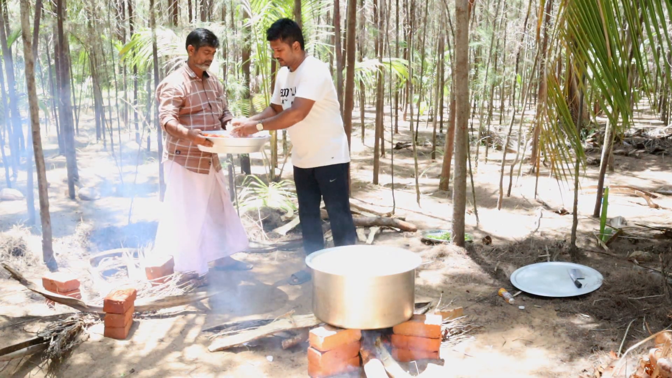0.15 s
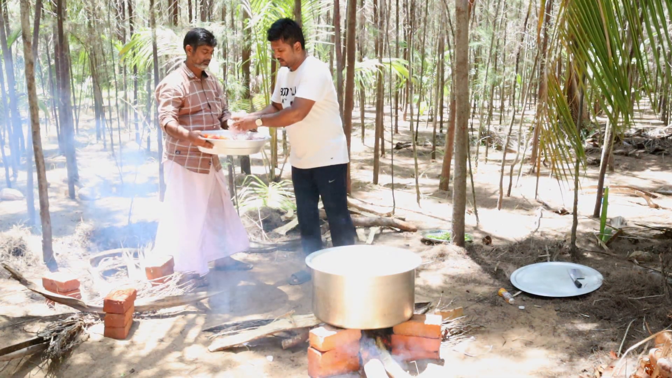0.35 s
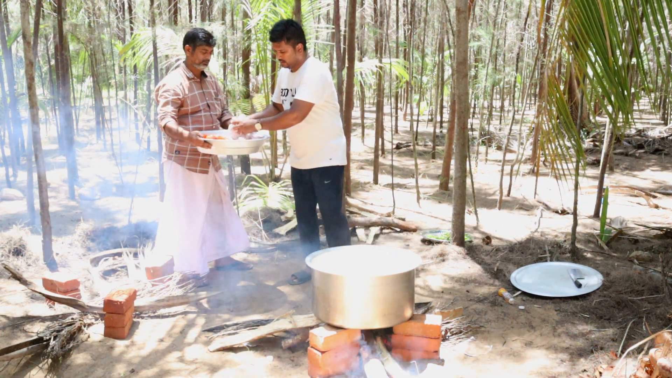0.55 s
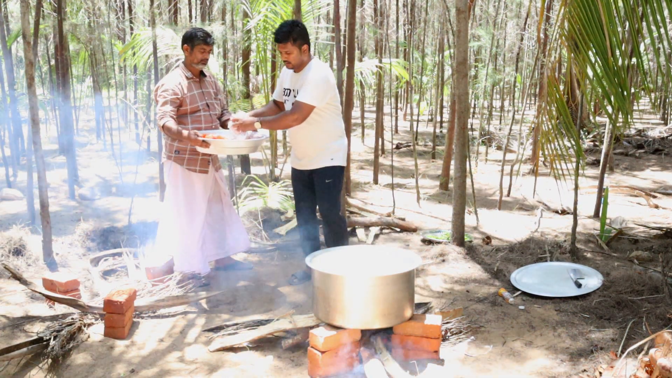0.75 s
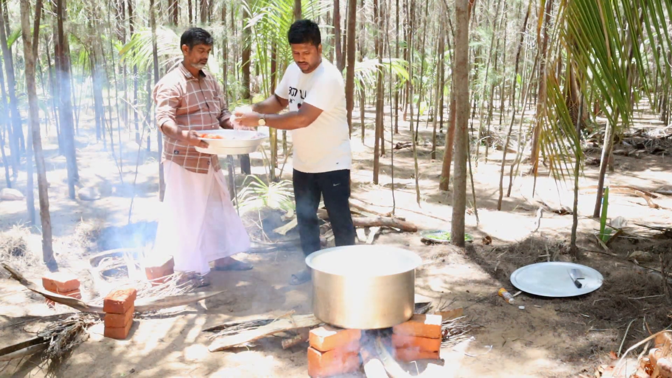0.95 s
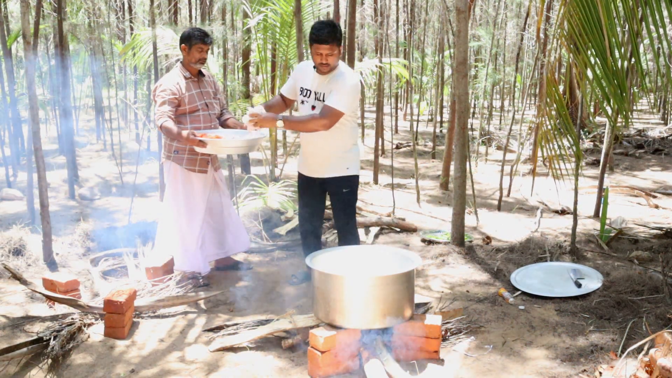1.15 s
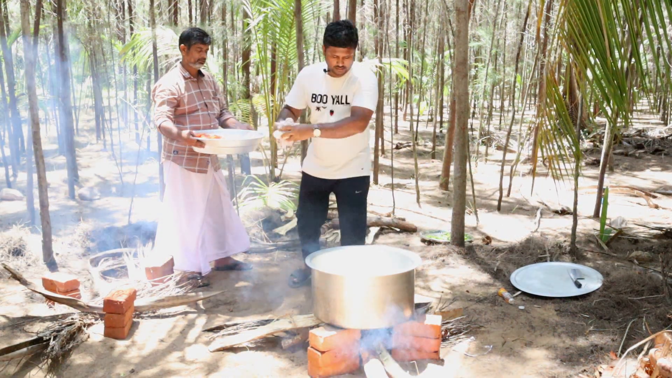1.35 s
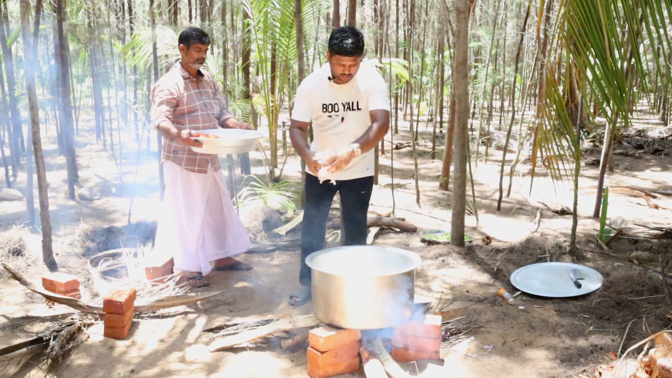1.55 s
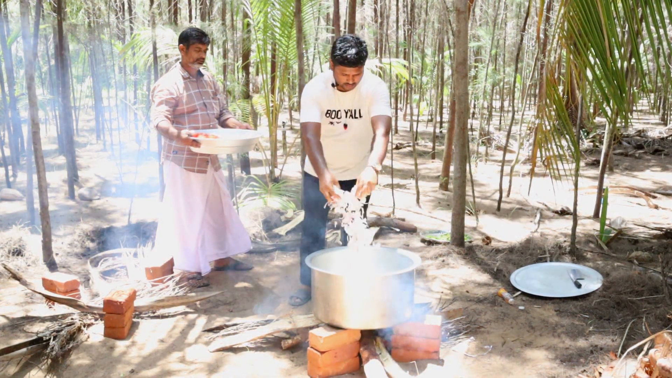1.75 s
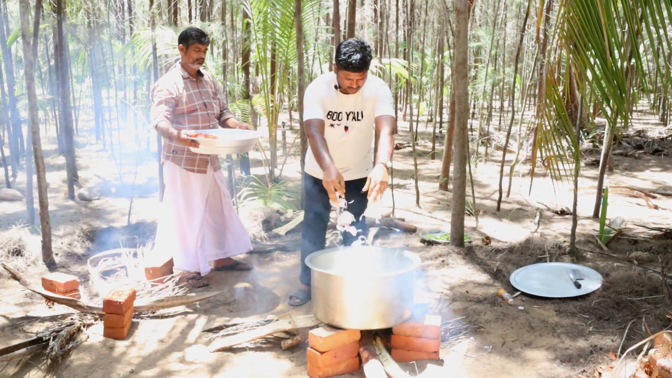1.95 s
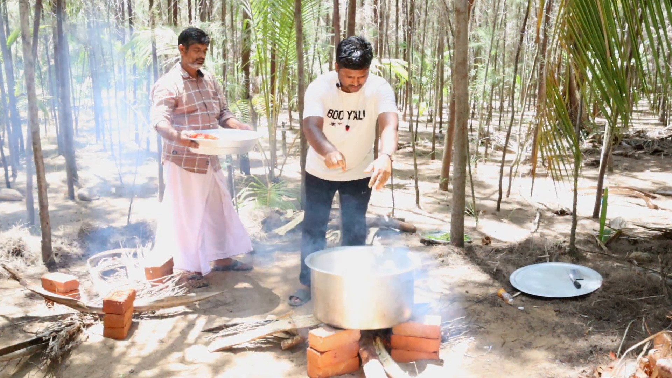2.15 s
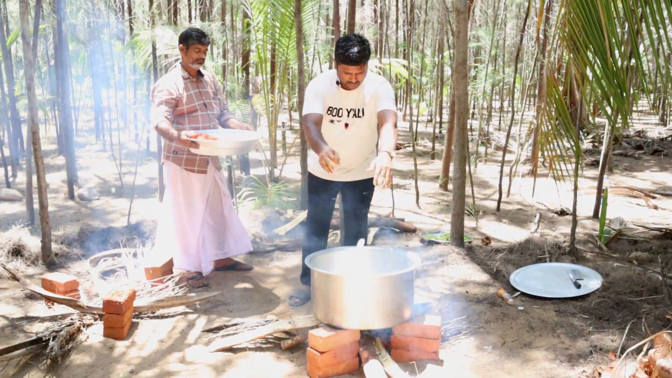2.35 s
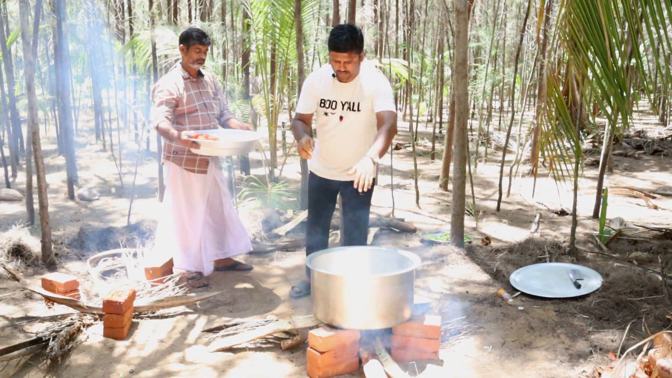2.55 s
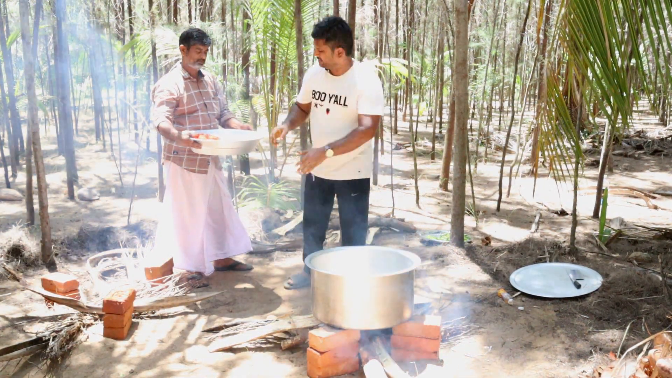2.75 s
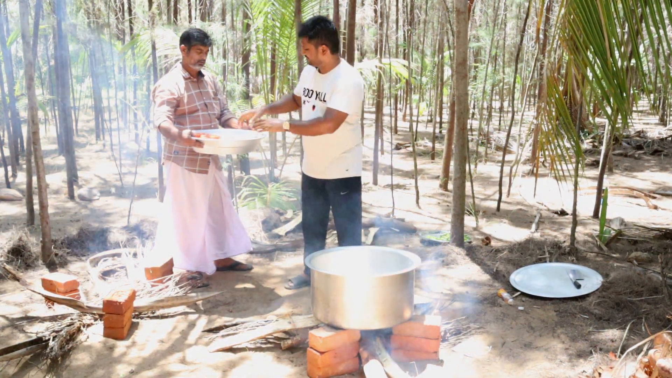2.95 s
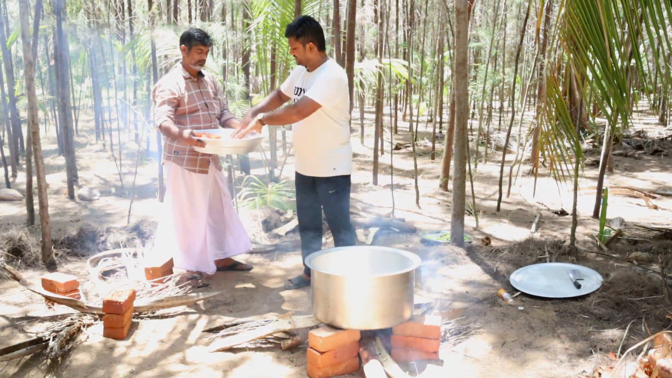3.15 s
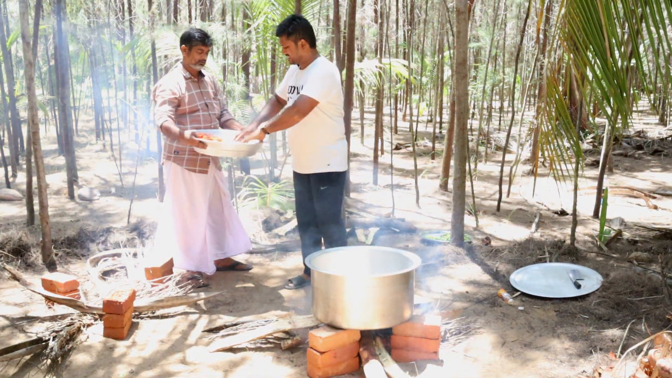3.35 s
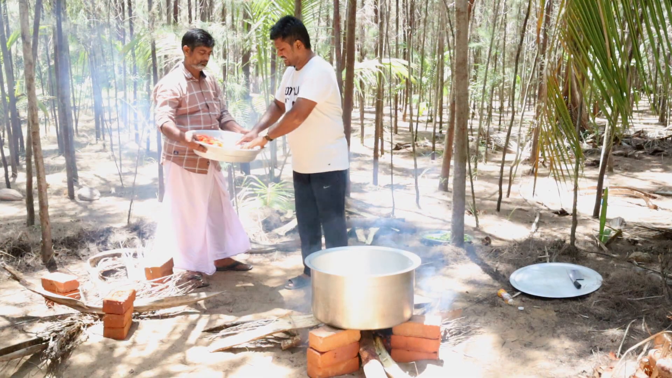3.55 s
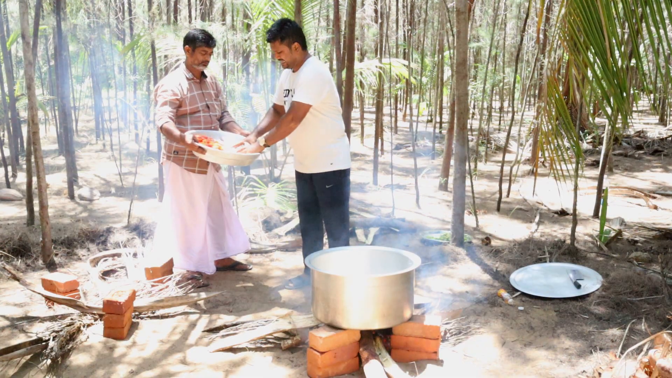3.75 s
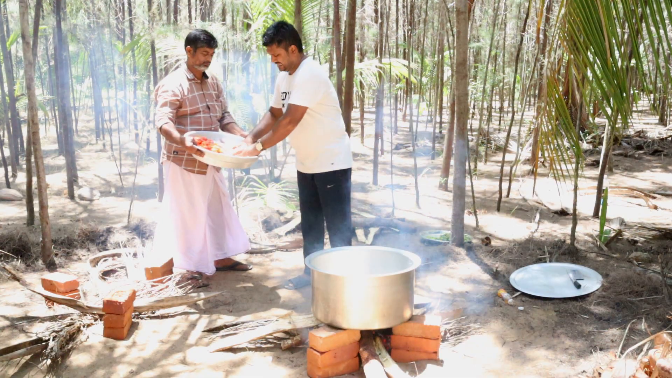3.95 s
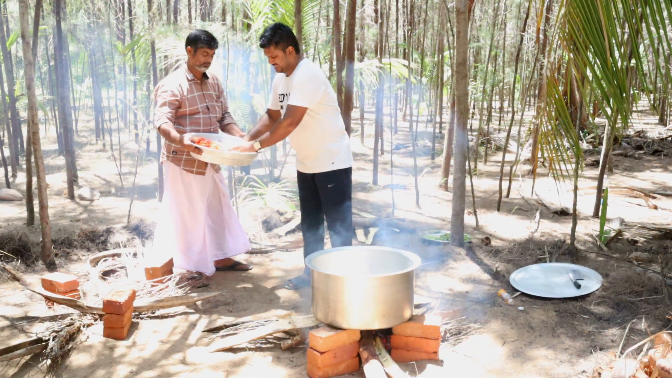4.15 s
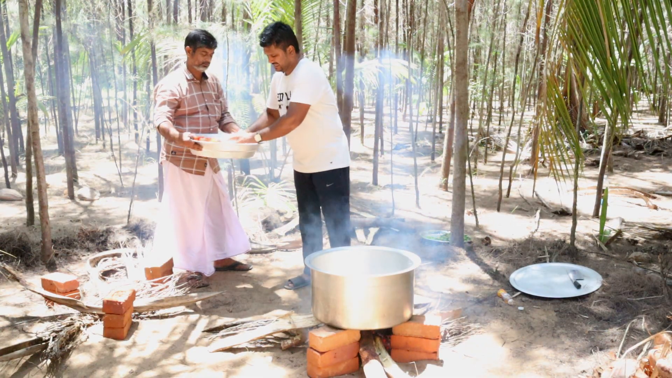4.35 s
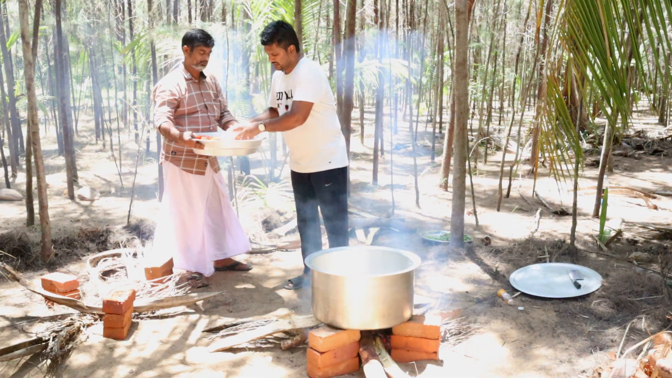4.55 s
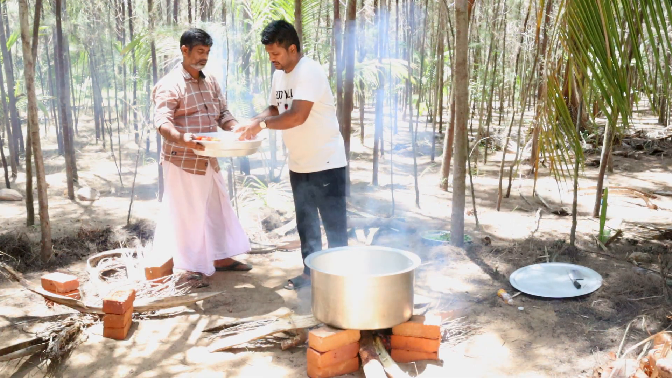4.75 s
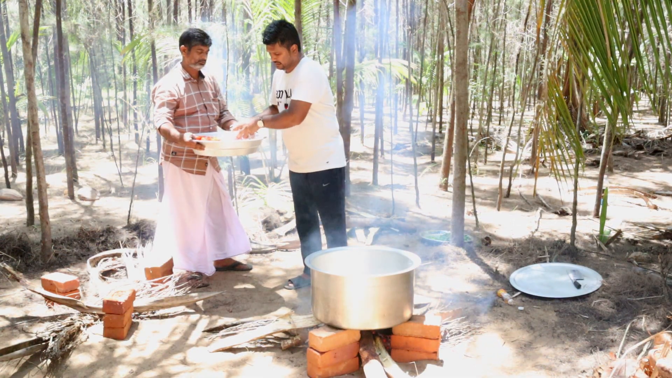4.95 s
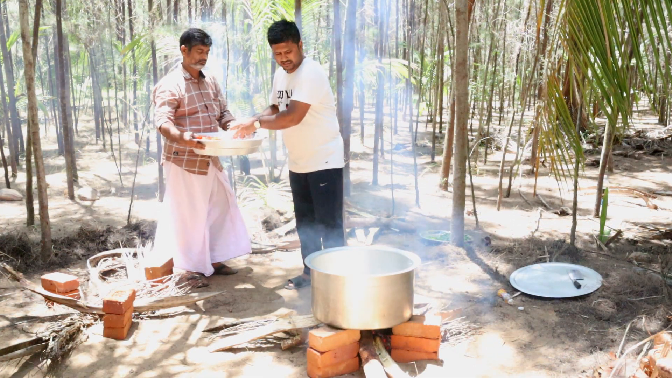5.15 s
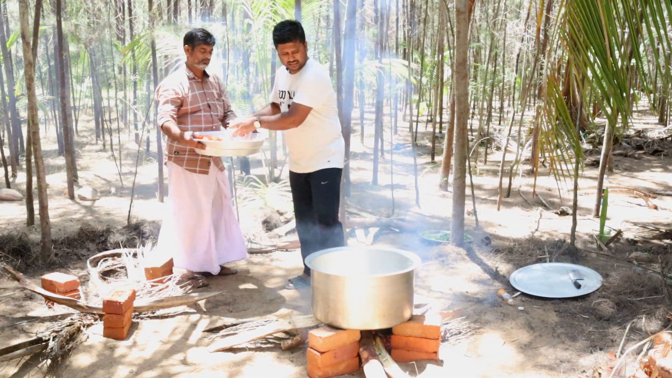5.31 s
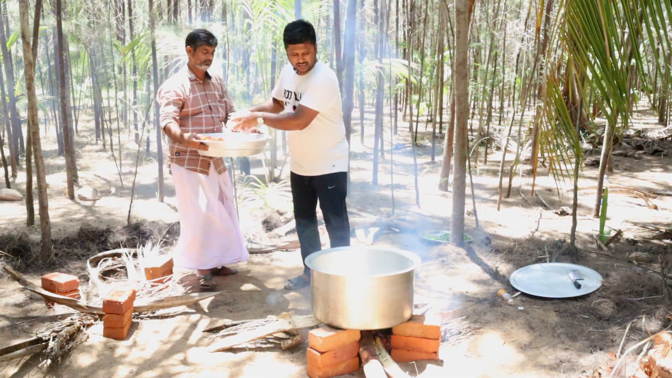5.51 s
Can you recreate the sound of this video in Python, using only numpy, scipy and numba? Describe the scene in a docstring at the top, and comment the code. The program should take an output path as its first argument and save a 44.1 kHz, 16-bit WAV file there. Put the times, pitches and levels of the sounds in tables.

```python
"""A wide metal pot of oil simmers over an open wood fire: damped bubble rings and fine hiss seethe together,
filtered noise makes the fire's soft roar and the wind's rumble, and hands rustle in a bowl of onion slices.
Droplets pop as clusters of short rings. Near two seconds a handful of slices drops in: a dense spatter,
struck pot modes and low gulps of trapped air sound as the oil flares into a loud sizzle with a steam hiss.
The sizzle then dies back to a crackle, while popping and rustling go on."""
import sys
import numpy as np
from scipy import signal
from scipy.fft import rfft, irfft
from scipy.io import wavfile
from scipy.ndimage import uniform_filter1d
from numba import njit

SR = 44100
rng = np.random.default_rng(int(sys.argv[2]) if len(sys.argv) > 2 else 0)


def persist_wave(psi):
    """Save psi, clipped to +-1, as 16-bit WAV."""
    counts = np.round(np.clip(psi, -1, 1) * 32767).astype(np.int16)
    wavfile.write(sys.argv[1], SR, np.atleast_2d(counts).T)


N = 246078

# How hard the oil fries. Each row: time in seconds, vigour in dB.
VIGOUR = [(0.0, -44), (0.53, -48), (1.15, -48), (1.92, -40.5), (1.96, -34.5), (2.11, -32.5), (2.33, -32),
          (2.56, -33), (2.77, -36.5), (3.0, -40), (3.09, -45), (3.9, -46.5), (4.62, -46.5), (5.58, -49)]
SIMMER_DB = -49  # the vigour that counts as a simmer
SPLASH_S = 1.957  # the handful hits the oil


def undb(db):
    """Level and amplitude: 20 dB is a factor of ten in gain."""
    return 10 ** (np.asarray(db) / 20)


def unit(x):
    """Normalization: scale a signal to rms 1."""
    return x / np.sqrt(np.mean(x ** 2))


def curves(table):
    """Linear interpolation: each column of a timed table becomes one value per sample."""
    s, *columns = np.transpose(table)
    return [np.interp(np.arange(N) / SR, s, column) for column in columns]


def colour(x, spectrum):
    """Spectral shaping: weight each frequency by (Hz, dB) points joined on a log frequency axis."""
    hz, db = np.transpose(spectrum)
    f = np.maximum(np.arange(N // 2 + 1) * SR / N, 1)
    gain = undb(np.interp(np.log(f), np.log(hz), db))
    return unit(irfft(rfft(x) * gain, N))


def walk(rate):
    """Slow random fluctuation: levels held 1 / rate seconds, smoothed twice and scaled to rms 1."""
    hold = int(SR / rate)
    steps = np.repeat(rng.standard_normal(N // hold + 1), hold)
    smooth = uniform_filter1d(uniform_filter1d(steps, hold), hold)
    return unit(smooth[:N])


@njit
def rings(start, hz, t60, size, rise, count):
    """Damped resonance: each sine swells over about rise cycles and decays, cut off 40 dB down."""
    out = np.zeros(count)
    for k in range(len(start)):
        turn = np.exp(2j * np.pi * hz[k] / SR - np.log(1000) / (t60[k] * SR))
        z, gap, shrink = size[k] + 0j, 1., np.exp(-hz[k] / (rise * SR))
        for i in range(int(start[k]), min(count, int(start[k] + t60[k] * SR * 2 / 3))):
            out[i] += z.imag * (1 - gap)
            z *= turn
            gap *= shrink
    return out


def above(x, hz):
    """Radiation efficiency: a small source radiates little bass, hence a high-pass."""
    return signal.sosfilt(signal.butter(3, hz, "high", fs=SR, output="sos"), x)


def add(out, s, db, sound):
    """Superposition: add a short sound at a time and peak level."""
    i = int(s * SR)
    out[i:i + len(sound)] += undb(db) * sound[:N - i] / np.abs(sound).max()


def bubbles(hz, octaves, cycles, rate, scatter_db):
    """Bubble resonance: steam bubbles burst at random, each ringing at a pitch set by its size.

    Centre in Hz, spread in octaves, cycles to fall 30 dB, grains a second, exponential level scatter in dB.
    """
    when, pitch, chance = rng.random((40000, 3))[:int(rate * N / SR)].T
    octave = octaves * np.log(pitch / (1 - pitch) + 1e-9) / 2  # logistic spread
    f = np.clip(hz * 2 ** octave, 150, 16000)
    size = undb(-scatter_db * np.log(1 - .998 * chance))  # a few are far louder
    grains = rings(when * N, f, 2 * cycles / f, size, 0.31, count=N)
    return unit(above(grains, 0.4 * hz))


def follow(layer):
    """Common drive: the level in dB of a layer rises and falls with the vigour of the frying."""
    # Each entry: level in dB at a simmer, dB per dB of vigour, lag in seconds (negative leads).
    follow_rows = {"wet": (-68.5, 1.77, 0.026), "large": (-57.5, 1.23, -0.047),
                   "middle": (-56.5, 0.7, 0.089), "small": (-54, 1.07, 0.071), "hiss": (-57, 0.98, 0.14),
                   "roar": (-57, 0.52, -0.094)}
    db, slope, lag_s = follow_rows[layer]
    s, vigour_db = np.transpose(VIGOUR)
    delayed_db = np.interp(np.arange(N) / SR - lag_s, s, vigour_db)
    return db + slope * (delayed_db - SIMMER_DB)


def spits(rate, scatter_db, tail_ms):
    """Impulsive excitation: lone spits of oil swell for about a millisecond and decay exponentially."""
    when, chance = rng.random((4000, 2)).T
    kicks = np.zeros(N)
    alive = np.arange(len(when)) < rate * N / SR
    size = undb(-scatter_db * np.log(1 - .96 * chance))
    np.add.at(kicks, (when * N).astype(int), alive * size)
    decay = np.exp(-1000 / (max(tail_ms, .1) * SR))
    return signal.lfilter([1], [1, -decay], uniform_filter1d(kicks, size=60))


def frying():
    """Superposed boiling noise: bubbles of four sizes, fine hiss and steam, lifted briefly by each spit."""
    # Steam rushing from the wet slices. Each row: time in seconds, level in dB.
    flare = [(1.55, -55.5), (1.74, -53), (1.95, -46.5), (2.09, -37.5), (2.19, -39), (2.35, -34.5),
             (2.49, -36.5), (2.63, -41.5), (2.9, -75), (3.09, -54), (3.2, -74)]
    # Spectrum of the rushing steam. Each row: frequency in Hz, relative level in dB per Hz.
    steam_spectrum = [(9000, -16.5), (10500, -3), (11700, 9.5), (13000, 8), (14400, 2), (15300, -11)]
    # Noise spectrum for the fine hiss, nearly flat from 7 to 13.5 kHz, with a steep low-pass edge above.
    # Each row: frequency in Hz, relative level in dB per Hz.
    hiss_spectrum = [(5000, -11), (7000, -5.5), (10000, -4.5), (13500, -5), (14300, -21), (14600, -45)]
    # Columns as bubbles() takes them; "wet" is water boiling out of the slices.
    sizes = {"wet": (2270, 0.091, 2.6, 1500., 5.3), "large": (1890, 0.41, 3.6, 1400., 2),
             "middle": (3300, 0.36, 6.7, 2200, 0.93), "small": (5230, 0.24, 6.4, 3000., 2.66)}
    steam_db, = curves([(flare[0][0] - .15, -80), *flare, (flare[-1][0] + 0.17, -80)])
    spit = spits(rate=89.0, scatter_db=4.1, tail_ms=1.82)
    boil = sum(undb(follow(layer)) * bubbles(*size) for layer, size in sizes.items())
    boil = signal.sosfilt(signal.butter(6, 9500, fs=SR, output="sos"), boil)
    fine_hiss = undb(follow("hiss")) * colour(rng.standard_normal(N), hiss_spectrum)
    steam = undb(steam_db) * colour(rng.standard_normal(N), steam_spectrum)
    seething = undb(1.3 * walk(9))
    hiss_flutter = undb(0.58 * walk(25.4))
    return seething * ((1 + .25 * spit) * boil + (1 + .5 * spit) * hiss_flutter * (fine_hiss + steam))


def air():
    """Turbulence noise: the fire's fluttering roar, and wind in gusts on the microphone."""
    # Spectrum of the fire. Each row: frequency in Hz, relative level in dB per Hz.
    roar_spectrum = [(70, -10.5), (130, -4), (230, -2.5), (345, -8), (560, -4.5), (900, -5.5), (1200, -11),
                     (2500, -44)]
    # Spectrum of the wind. Each row: frequency in Hz, relative level in dB per Hz.
    wind_spectrum = [(12, -1), (26, -1.5), (48, 3.5), (110, -2), (200, -40)]
    # Gusts before flutter. Each row: centre in seconds, level in dB added to the breeze, length in seconds.
    gusts = [(0.47, -53, 0.058), (0.62, -64, 0.26), (1.3, -83, 2.6), (1.44, -50, 0.13), (1.617, -48, 0.094),
             (1.85, -56, 0.31)]
    breeze_db = -61.5
    t = np.arange(N) / SR
    wind = undb(breeze_db) + sum(undb(db) * np.exp(-(2 * (t - s) / length) ** 2) for s, db, length in gusts)
    roar = undb(follow("roar") + 1.5 * walk(16)) * colour(rng.standard_normal(N), roar_spectrum)
    return roar + wind * undb(3.4 * walk(14.)) * colour(rng.standard_normal(N), wind_spectrum)


def rustle():
    """Granular contact and cavity resonance: slices slip over each other in patches and tap the bowl."""
    # Hands gathering slices, before flutter. Each row: time in seconds, slipping in dB, hollow taps in dB.
    gathering = [(0, -64.5, -61.5), (.7, -52.5, -57.5), (1.1, -64, -62), (2.8, -51, -59), (3.15, -56, -54),
                 (3.45, -52.5, -57.5), (3.85, -48.5, -53), (4.25, -51, -61), (4.36, -54, -58.5),
                 (4.5, -55.5, -61), (4.75, -54.5, -52.5), (5.2, -64, -63.5), (5.58, -56, -59.5)]
    slices_db, bowl_db = curves(gathering)
    patches = undb(2.7 * walk(22.11))
    slipping = bubbles(hz=1210, octaves=0.57, cycles=2, rate=900, scatter_db=1.6)
    taps = bubbles(hz=358, octaves=0.17, cycles=4, rate=140., scatter_db=0.56)
    return patches * (undb(slices_db) * slipping + undb(bowl_db) * taps)


def crackle(count=420):
    """Inhomogeneous random process: rows of small pops, denser and louder when the oil fries harder."""
    level_db, scatter_db, centre_hz, octaves = -37, 1.5, 3990, 0.356
    level_follow, crowd = 0.75, .5  # level and density of the pops, dB per dB of vigour
    when, loud, spread = rng.random((count, 3)).T
    t = np.arange(0, N - 1, 100) / SR
    vigour_s, vigour_db = np.transpose(VIGOUR)
    busy = np.cumsum(undb(crowd * np.interp(t, vigour_s, vigour_db)))
    s = np.interp(when * busy[-1], busy, t)  # inverse of the cumulative density
    lift_db = np.interp(s, vigour_s, vigour_db) - SIMMER_DB
    hz = centre_hz * 2 ** (octaves * rng.standard_normal(count))
    peak_db = level_db + level_follow * lift_db - scatter_db * np.log(1 - .95 * loud)
    # tighter chirps in bare oil, broader ticks once the slices are in
    pitch_spread = np.where(s < SPLASH_S, .14, .24) + 0.826 * spread
    return np.transpose([s, peak_db, hz, pitch_spread])


def pops(count=12):
    """Modal clustering: a tight cluster of pitches chirps, a wide one cracks; the pot walls scatter it."""
    # Bursting droplets and fire cracks, before scattering.
    # Each row: start in seconds, peak in dB, pitch in Hz, nominal pitch spread in octaves.
    bursts = [(0.5712, -20.5, 4800, 0.79), (0.5815, -28, 1070, 0.93), (0.8395, -29.5, 8060, 0.27),
              (1.188, -28, 10900, 0.25), (1.0061, -26.5, 4400, 0.23), (1.1206, -28, 9300, 0.28),
              (1.1526, -34, 3450, 0.13), (1.1942, -23, 6440, 0.34), (1.2054, -26, 5400, 0.76),
              (1.3448, -25, 3640, 0.29), (1.4007, -21, 3910, 0.13), (1.5276, -26.5, 4320, 0.14),
              (1.5661, -18.5, 3470, 1.03), (1.6266, -25.5, 1440, 0.21), (1.7204, -22.5, 4150, 0.29),
              (1.7585, -20.5, 3660, 1.1), (1.8051, -23, 3330, 0.11), (1.8402, -20.5, 2860, 0.8),
              (1.916, -10, 2800, 1.05), (1.9572, -12, 4560, 0.57), (2.0968, -13.5, 2180, 0.63),
              (2.5663, -16, 1590, 0.17), (2.6252, -16, 3810, 0.11), (2.6655, -16.5, 3280, 0.36),
              (2.8158, -25, 3020, 0.24), (2.8439, -1, 2780, 0.6), (2.8971, -11, 6200, 0.66),
              (2.9017, -14.5, 2660, 0.65), (2.913, -19, 3520, 0.75), (2.9967, -14.5, 8250, 0.47),
              (3.0186, -17, 5650, 0.75), (3.1388, -24, 5360, 0.23), (3.299, -27, 2770, 0.26),
              (3.7079, -25, 1160, 0.87), (3.8739, -21.5, 3250, 0.58), (3.93, -29.5, 885, 0.53),
              (4.01, -31, 1500, 0.21), (3.9542, -30, 4060, 0.13), (4.2806, -21.5, 2270, 0.6),
              (4.3055, -25, 6800, 0.67), (4.3589, -23, 3940, 0.38), (4.6317, -23.5, 2900, 0.77),
              (5.0646, -31.5, 2940, 0.1), (5.1995, -26, 6210, 0.53), (5.3015, -23, 5350, 0.65),
              (5.3267, -26, 3660, 0.83)]
    # Droplets that sputter on.
    # Each row: start in seconds, peak in dB before scattering, pitch in Hz, nominal spread in octaves.
    sputters = [(0.113, -32, 2915, 0.21), (0.214, -34, 3180, 0.188), (1.9483, -16.5, 3300, 0.618),
                (2.8449, -23, 2230, 0.57), (3.431, -28.5, 1460, 0.57), (3.476, -36, 1120, 0.18),
                (3.595, -32, 1290, 0.55), (3.681, -35, 2130, 0.3)]
    sputter_ms, pop_ms, pop_slope = 9.7, 0.502, 0.557  # length scales in ms, and an exponent
    out = np.zeros(N)
    cluster = np.linspace(-1, 1, count)
    # tight clusters ring longer
    brief = [(*p, pop_ms / max(p[3], .05) ** pop_slope) for p in [*bursts, *crackle()]]
    rows = [(*p, sputter_ms) for p in sputters] + brief
    for (s, db, hz, octaves, ms), (detune, delay) in zip(rows, rng.random((len(rows), 2, count))):
        octave = 1.21 * octaves * (cluster + 0.67 * (detune - .5))
        f = np.clip(hz * 2 ** octave, 300, 14000)
        start = 0.97 * delay * max(ms - 1.2, 0) * SR / 1000  # long bursts sputter instead of starting at once
        t60 = 12.5 * ms / (1 + 0.78 * ms * octaves) / 1000
        burst = rings(start, f, np.full(count, t60), np.ones(count), 0.085, count=3000)
        add(out, s, db, above(burst, 0.88 * f[0]))
    t = np.arange(1500) / SR
    walls = undb(-31.0) * rng.standard_normal(len(t)) * np.exp(-t / 0.004) * (t > .0006)
    return out + signal.fftconvolve(out, walls)[:N]


def splash():
    """Transient envelope: a dense spatter swells just before the handful lands and dies into the sizzle."""
    level_db, rise_s, fall_s = -18, 0.0022, 0.019
    t = np.arange(N) / SR - SPLASH_S
    shape = np.exp(np.where(t < 0, t / rise_s, -t / fall_s))
    spatter = bubbles(hz=2570, octaves=1.0, cycles=6.8, rate=3600.0, scatter_db=1.9)
    return undb(level_db) * shape * spatter


def thuds():
    """Impact excitation: a piece pushes the pot for its contact time; longer pushes stir only low modes."""
    # Firm pieces striking the pot. Each row: start in seconds, peak in dB, nominal contact time in ms.
    strikes = [(1.9567, 0, 0.32), (2.0071, -10.5, 0.66), (2.1203, -11, 0.69), (2.194, -23, 0.64),
               (2.222, -22, 1.3), (2.27, -26, 0.45), (2.617, -26, 2.6), (2.8431, -29.5, 1.7)]
    # Modes of the pot. Each row: nominal frequency in Hz, relative level in dB, 60 dB decay in seconds.
    pot = [(342, -3.5, 0.026), (485, -5, 0.032), (660, -15, 0.042), (890, -5.5, 0.066), (963, -0.5, 0.026),
           (1140, 10.5, 0.0059), (1690, 6.5, 0.011), (2170, -13, 0.26), (2480, -7, 0.051)]
    out = np.zeros(N)
    hz, db, t60 = np.transpose(pot)
    chance = rng.standard_normal((len(strikes), len(pot)))
    for (s, peak_db, contact_ms), detune in zip(strikes, chance):
        ring = rings(0 * hz, hz * (1 + 0.0095 * detune), t60, undb(db), 0.092, count=6000)
        push = np.hanning(int(max(contact_ms, .05) * SR / 1000) + 3)
        add(out, s, peak_db, -above(np.convolve(ring, push), 287))
    return out


def gulps():
    """Cavity resonance: big air pockets dragged under the oil ring low and break up into ragged bubbling."""
    # Gulps as slices sink. Each row: start in seconds, peak in dB before flutter, lower pitch in Hz.
    pockets = [(1.957, -27.5, 254), (1.985, -20, 198), (2.044, -23.5, 185), (2.094, -24.5, 193),
               (2.122, -24, 193), (2.192, -27.5, 187), (2.232, -29, 190), (2.271, -23.5, 209),
               (2.335, -28.5, 218), (2.375, -30.5, 204), (2.409, -35, 186), (2.616, -32.5, 178)]
    churn_db, linger_s = -5.5, 0.046  # bubbling relative to the gulps, and its averaging time
    out = np.zeros(N)
    for s, db, hz in pockets:
        pitches, t60 = hz * np.array([1, 1.25]), np.array([.07, .045])
        add(out, s, db, rings(np.zeros(2), pitches, t60, np.array([1, .55]), 2.2, count=8000))
    out = out * undb(1.1 * walk(60))  # unsteady level
    power = uniform_filter1d(out ** 2, size=int(linger_s * SR))
    stir = np.sqrt(np.maximum(power, 0))
    churn = bubbles(hz=356, octaves=0.94, cycles=4.1, rate=300, scatter_db=3.3)
    return out + undb(churn_db) * stir * churn


def scene():
    """Linear superposition: every source adds at one microphone."""
    return (frying() + pops() + thuds() + splash() + gulps() + rustle() + air())[None]


def record(dry):
    """Clipping and low-pass: peaks are clipped at full scale, then a steep low-pass rolls off above 15150 Hz."""
    low_pass = signal.ellip(10, .2, 60, 15150, fs=SR, output="sos")
    return signal.sosfilt(low_pass, np.clip(dry, -1, 1))


dry = scene()
out = record(dry)
persist_wave(out)
```